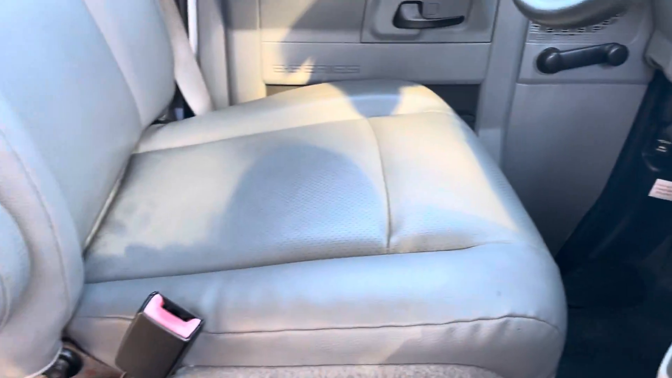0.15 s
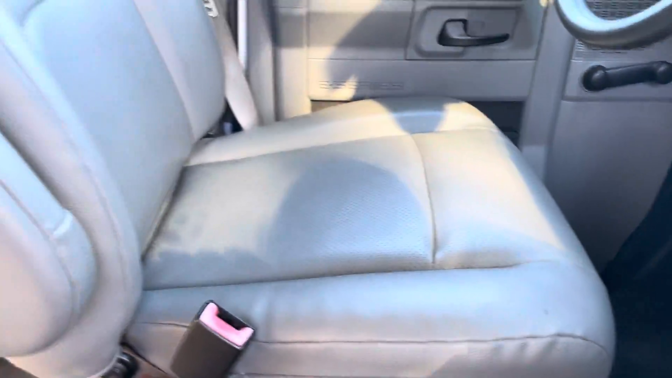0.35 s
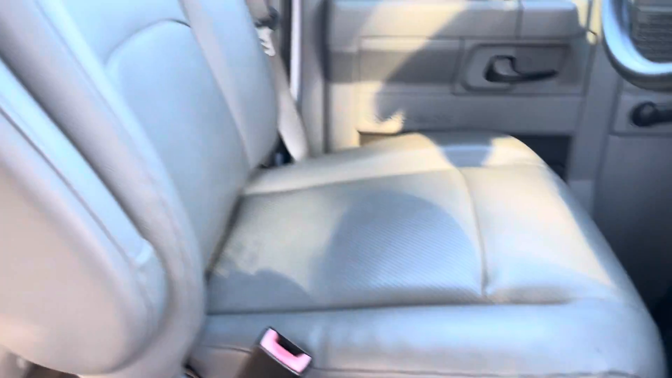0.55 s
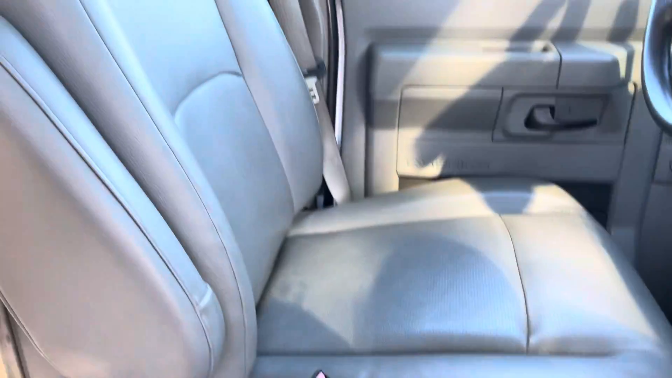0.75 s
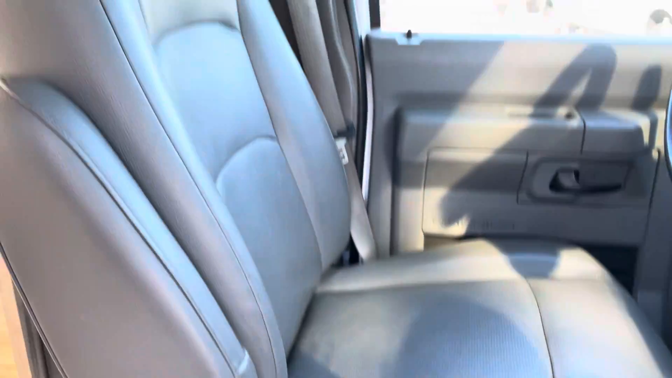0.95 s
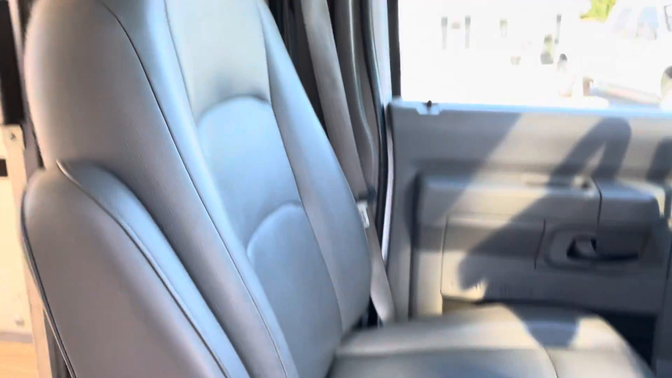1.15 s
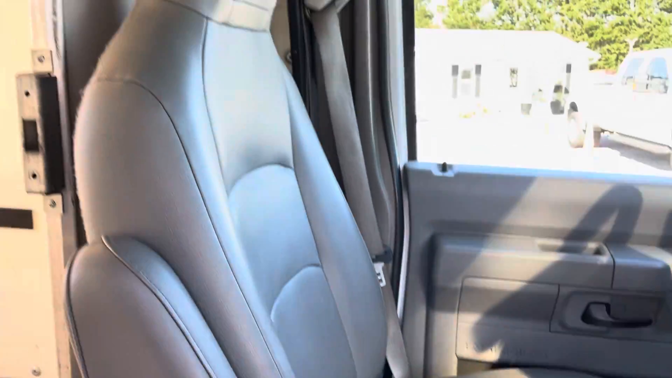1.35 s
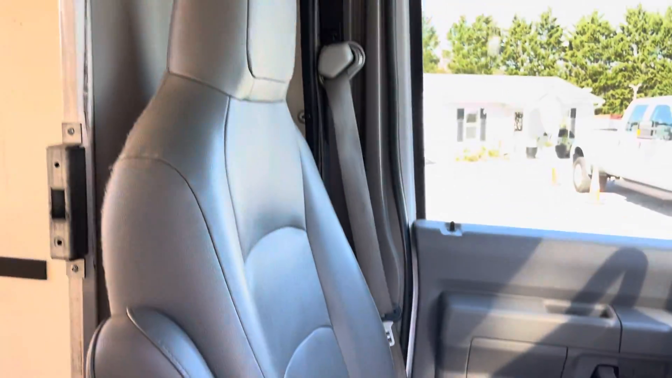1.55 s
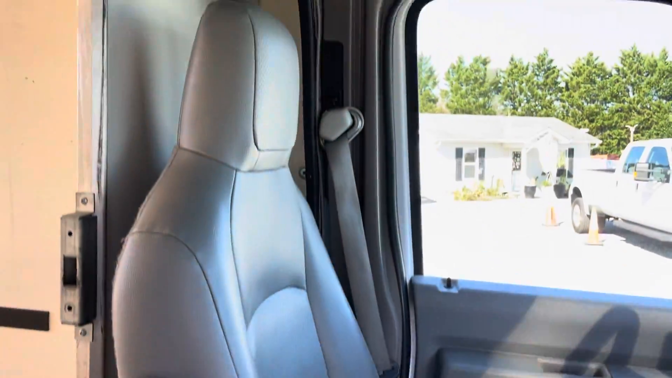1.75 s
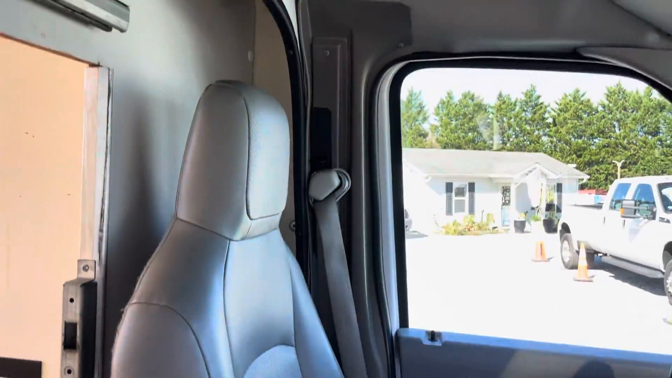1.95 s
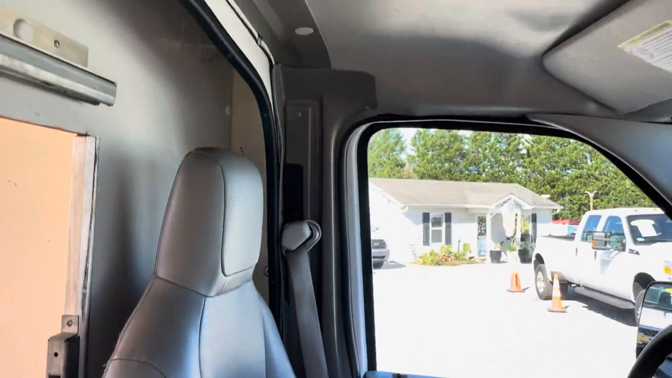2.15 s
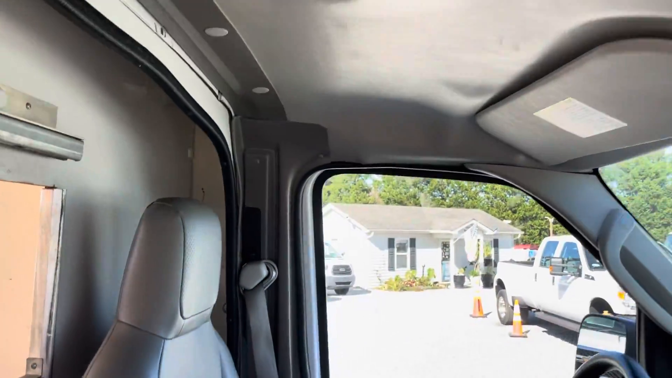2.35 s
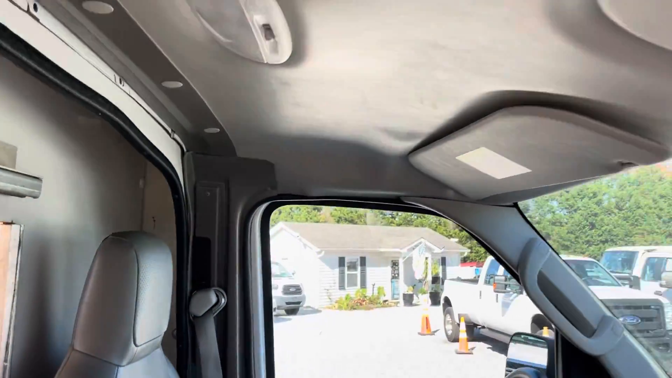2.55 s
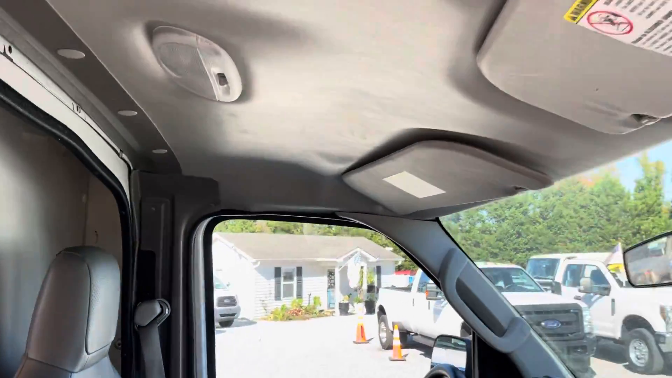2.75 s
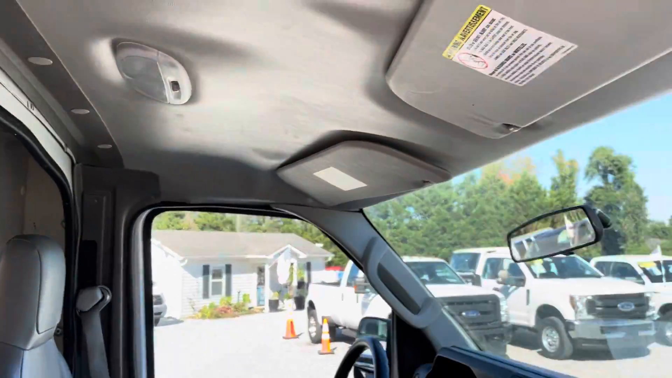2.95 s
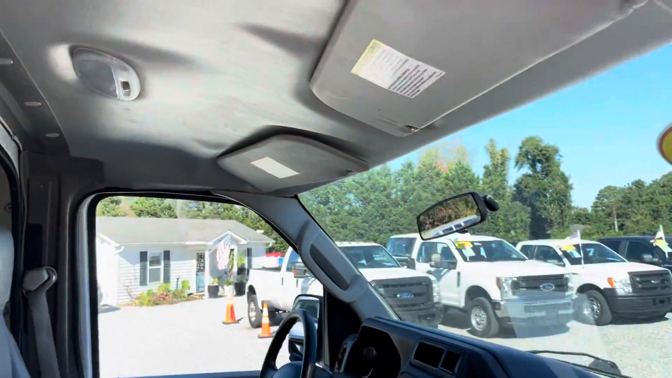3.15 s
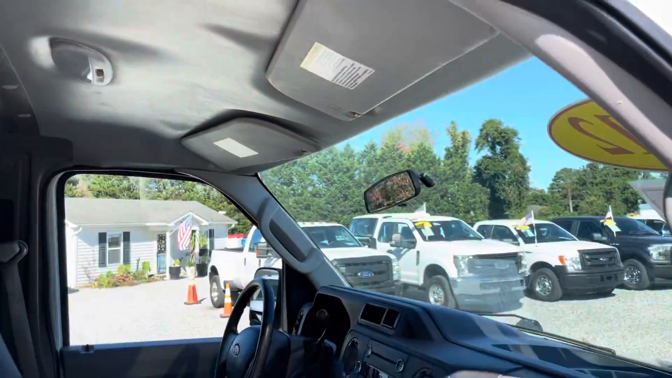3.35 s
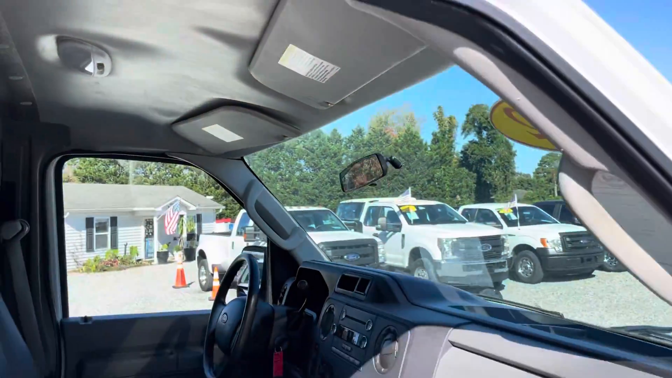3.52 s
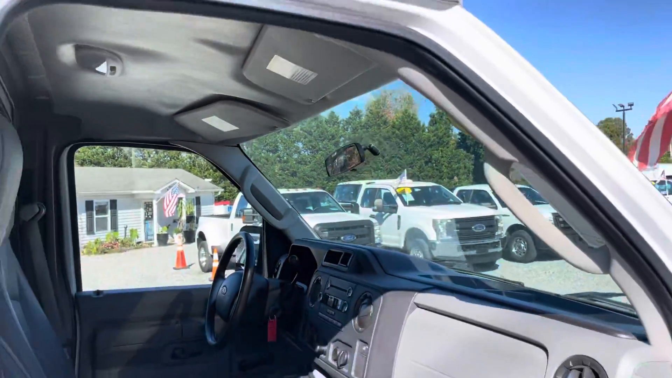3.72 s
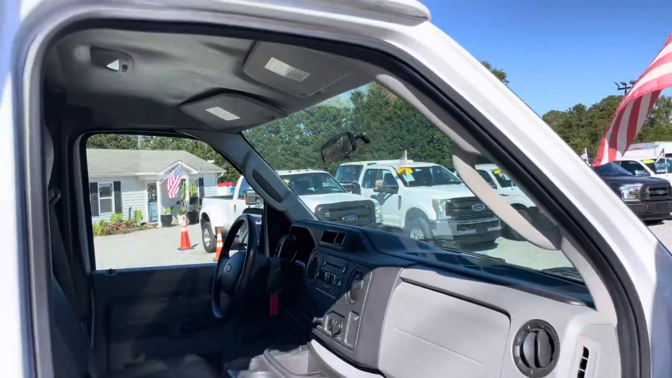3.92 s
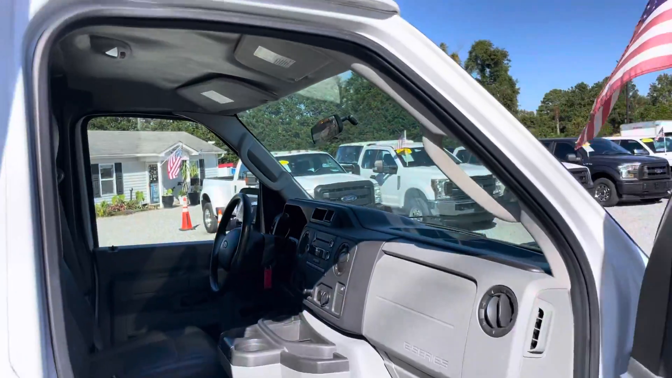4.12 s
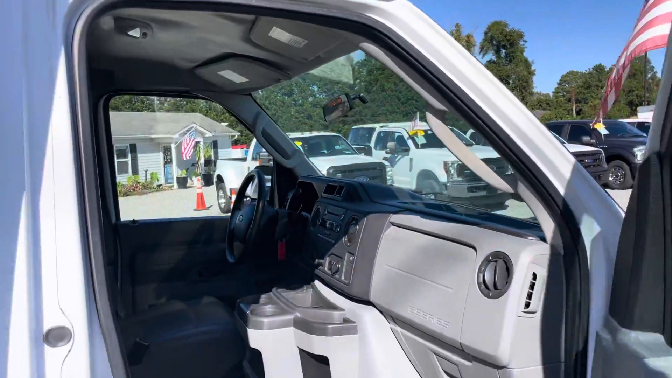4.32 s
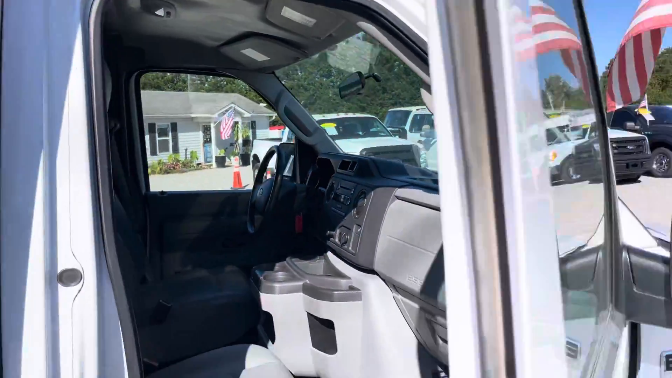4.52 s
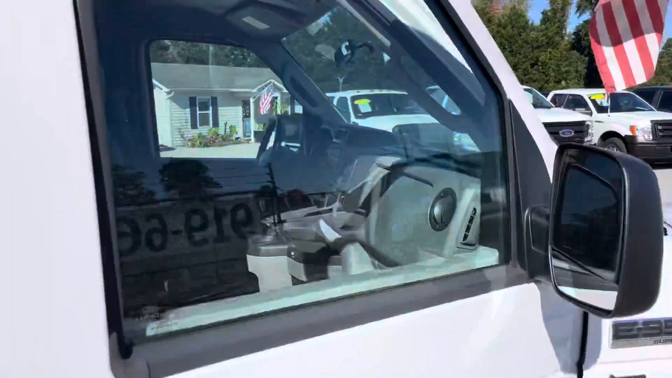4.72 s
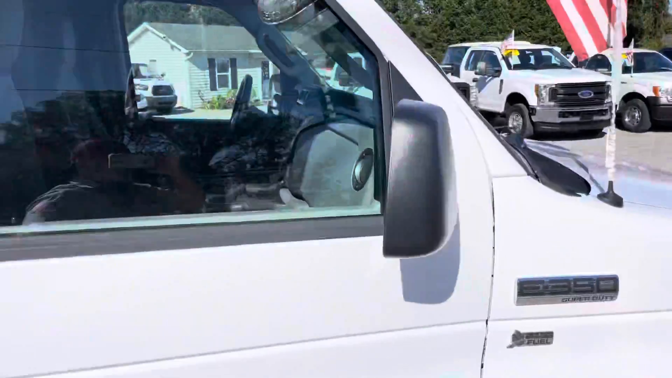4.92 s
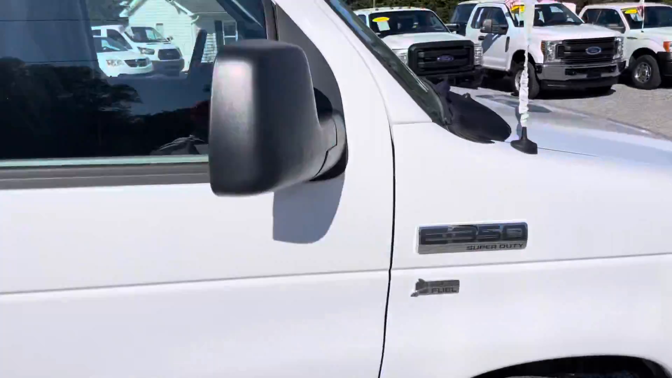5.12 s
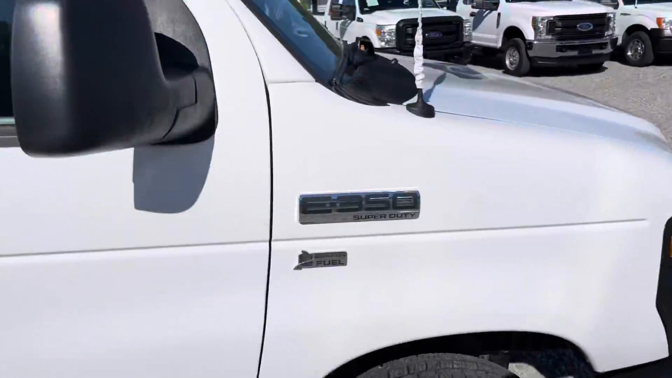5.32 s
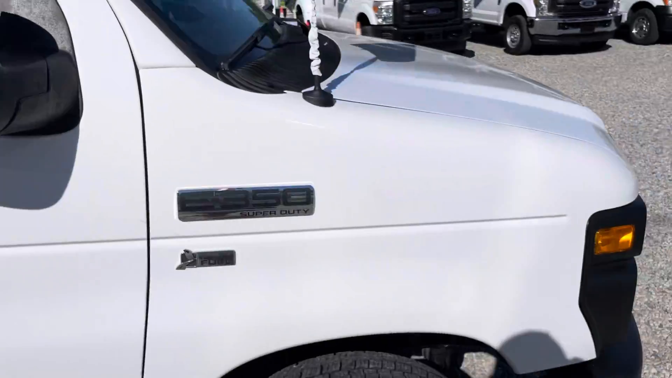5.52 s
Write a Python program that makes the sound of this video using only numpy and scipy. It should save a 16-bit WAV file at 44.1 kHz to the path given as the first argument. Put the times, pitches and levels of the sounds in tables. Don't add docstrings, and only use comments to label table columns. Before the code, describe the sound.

Low engine hum and airy outdoor noise, small squeaks and crunches of movement, then a hard metallic van door slam and hollow aftershake.

```python
import sys
import numpy as np
from scipy import signal
from scipy.fft import rfft, irfft
from scipy.io import wavfile

SR = 44100
rng = np.random.default_rng(int(sys.argv[2]) if len(sys.argv) > 2 else 0)


def wav_out(sig):
    wavfile.write(sys.argv[1], SR, np.round(np.clip(np.atleast_2d(sig).T, -1, 1) * 32767).astype(np.int16))


def boost(x):
    u = np.asarray(x, float) / 20
    return 10 ** u


N = 245637

# freq_hz [Hz], left_lead_rad [rad]; ports cancel near 8.5 kHz, agree above 12 kHz
PORT_PHASE = [(0, 0), (300, .5), (700, 1.3), (1600, 1.9), (2300, 1.1), (4900, 1.5), (6200, .3),
              (7300, -2.2), (8100, -2.7), (9500, -3.8), (11000, -4.8), (12300, -6.05), (20000, -6.05)]
# freq_hz [Hz], left_minus_right_db [dB]
NEAR_TILT = [(60, -0.5), (150, 0), (380, 1), (950, 2.5), (2380, -3.5), (5980, 2), (15000, 0)]
# freq_hz [Hz], left_minus_right_db [dB]
FAR_TILT = [(60, -1.0), (150, 0), (380, 0.5), (950, -1.0), (2380, 0), (5980, 6.5), (15000, -2.5)]
# time_s [s], outside_share [0-1]
OUTSIDE_SHARE = [(0, 0.22), (1.5, 0.09), (2.5, 0.51), (3.5, 0.97), (5, 0.83)]

# time_s [s], cycle_hz [Hz]
ENGINE_CYCLE_HZ = [(0, 5.65), (1.1, 5.63), (2, 5.6), (3, 5.575), (3.6, 5.61), (4.2, 5.635), (5.5, 5.62)]
ENGINE_ORDERS = [8, 9, 10, 11, 13, 14, 15, 16, 17, 19, 21, 23, 24, 25, 26, 27]
PHONE_STATIONS_S = [.7, 1.8, 3.0, 3.9, 4.6]
ORDER_LEVELS_DB = [(-31, -33, -37, -33.5, -34.5), (-39, -76, -50, -52, -55), (-43.5, -53, -50, -52, -52),
                   (-35.5, -35.5, -37.5, -40, -42), (-36.5, -38, -57, -35.5, -38),
                   (-42.5, -43, -36.5, -31.5, -35), (-52, -73, -61, -66, -59), (-50, -61, -41, -48, -46),
                   (-59, -49, -38, -36, -41), (-72, -46, -46, -49, -68), (-68, -54, -64, -62, -57),
                   (-46.5, -56, -61, -48, -43), (-51, -50, -49, -45.5, -42), (-76, -83, -55, -46, -59),
                   (-47, -52.5, -47.5, -40, -43), (-50, -50, -46, -39.5, -45.5)]
# time_s [s], left_minus_right_db [dB]
ENGINE_BALANCE = [(0, -1.5), (1.8, -1.5), (2.6, 0), (4.5, -0.5), (5.2, -1)]
HIGH_ORDER_HZ, HIGH_ORDER_DB, HIGH_ORDER_FAR_DB = 191.6, -37.5, -58
HIGH_ORDER_NEAREST_S, HIGH_ORDER_SPAN_S = 4.5, 0.31
FAN_HZ = 233
# time_s [s], level_db [dB rms]
FAN_LEVEL = [(0, -58), (2.4, -61), (2.62, -45.5), (3.0, -43.5), (3.2, -62), (3.6, -48), (4.1, -40.5),
             (4.3, -43.5), (4.45, -43.5), (4.9, -41), (5.5, -43.5)]

# time_s [s], level_db [dB]
LOT_LOUDNESS = [(0, -52), (.3, -47), (1.5, -49), (2.1, -47.5), (2.5, -49), (2.97, -44.5), (3.35, -41.5),
                (3.6, -41.5), (4.17, -37), (4.6, -34.5), (4.85, -33), (5.06, -27.5), (5.18, -39.5),
                (5.29, -27.5), (5.41, -36.5), (5.52, -33)]
# freq_hz [Hz], density_db [dB per Hz]
LOT_SUM_SPECTRUM = [(15, -37.5), (25, -25), (53, -8), (78, -7.5), (354, -27), (911, -30.5), (1890, -38.5),
                    (6560, -57), (7310, -59), (8360, -99), (9320, -65), (11000, -61), (13600, -55),
                    (14800, -61), (16000, -91)]
# freq_hz [Hz], density_db [dB per Hz]
LOT_DIFFERENCE_SPECTRUM = [(15, -40), (25, -19), (70, 4), (108, -16), (157, 0.5), (263, -13), (911, -11.5),
                           (2160, -25.5), (3160, -30), (3920, -34.5), (5570, -41.5), (9070, -36),
                           (11300, -43), (12900, -58), (16000, -72)]
LOT_DB, DIFFERENCE_DB = -47, -17
# centre_hz [Hz], loudness_share [0-1], outside_gain_db [dB]
LOT_MOTION = [
    (191, 0.93, -3),
    (830, 0.99, -0.5),
    (3700, 0.67, 1.5),
    (12000, 0.56, 1.5),
]
# start_s [s], length_s [s], rumble_db [dB], hiss_db [dB], air_db [dB]
PORT_SHADES = [
    (1.617, 0.52, 1.5, 3, -4),
    (2.31, 0.46, 4.5, 1.5, 0.5),
    (4.274, 0.19, -2.5, -5, -1.5),
    (5.053, 0.1, -0.5, 0, -4.5),
]
SHADE_EDGE_S = 0.16
# centre_hz [Hz], width_hz [Hz], cab_db [dB], outside_db [dB]
HOLLOW_BANDS = [(297.2, 31, -59, -55.5), (412.4, 59, -53, -69.5), (872, 97, -62, -49),
                (1044, 220, -58.5, -52), (1820, 330, -66.5, -52), (2560, 160, -94, -54),
                (2260, 620, -71, -65), (773, 35, -61.5, -60), (1000, 37, -71, -60), (1493, 61, -67, -54.5),
                (686, 50, -67, -61), (555, 30, -61, -75), (1155, 24, -72, -57)]
# centre_hz [Hz], width_hz [Hz], level_db [dB]
FLICKER_BANDS = [
    (7960, 310, -88.5),
    (9900, 950, -102),
    (15300, 800, -79),
]

# start_s [s], length_s [s], level_db [dB], pitch_hz [Hz]
CHIRPS = [
    (0.203, 0.012, -57, 6520),
    (0.229, 0.069, -64.5, 6630),
    (.314, 0.05, -72, 6300),
]
CHIRP_RISE_HZ_PER_S, CHIRP_ATTACK_S, CHIRP_T60_S = 900, 0.013, 0.058
WHINE_S, WHINE_HOLD_S, WHINE_DB, WHINE_T60_S = 0.3, 0.16, -65, 0.82
WHINE_TOP_HZ, WHINE_TOP_S, WHINE_ARCH_HZ_PER_S2 = 3190, 0.4, 2100
# start_s [s], length_s [s], from_hz [Hz], to_hz [Hz], level_db [dB]
VINYL_SQUEAKS = [
    (.35, .08, 2280, 2250, -68),
    (1.72, .1, 1960, 2150, -58),
    (1.85, .09, 2220, 2240, -64),
    (1.97, .03, 3200, 3260, -66),
    (2.25, .04, 1880, 1930, -64),
    (.245, .04, 3020, 3050, -64),
]
# start_s [s], peak_db [dB], centre_hz [Hz], t60_s [s], bright_db [dB]
SNAP_TICKS = [(0.455, -48, 4930, 0.037, -49), (0.596, -45, 4800, 0.044, -47),
              (2.715, -48, 5000, 0.024, -73), (2.814, -33, 5500, 0.03, -73), (3.163, -37, 2960, 0.042, -57),
              (3.365, -35, 2880, 0.018, -76), (3.404, -32, 1998, 0.03, -49), (3.64, -40, 3520, 0.045, -52),
              (4.016, -42, 5060, 0.037, -60), (4.809, -31, 4300, 0.051, -45.5),
              (4.91, -40, 4000, 0.029, -45), (4.966, -49, 6030, 0.035, -44),
              (5.126, -39.5, 4000, 0.026, -50), (4.935, -50, 6000, 0.017, -57),
              (5.265, -54, 5000, 0.016, -49), (5.39, -56, 4980, 0.05, -52), (5.482, -52, 6040, 0.06, -48)]
FIRST_STROKE = 4.5
# start_s [s], peak_db [dB], centre_hz [Hz], t60_s [s], low_share [-]
DULL_KNOCKS = [(2.94, -32, 1200, .03, .2), (3.365, -20, 1100, .03, .2), (3.3655, -19, 1650, .02, .1),
               (3.405, -19, 1150, .025, .1), (3.406, -18, 1800, .02, .1), (3.437, -26, 1600, .02, .1),
               (3.456, -24, 1550, .02, .1), (3.5012, -11, 1140, .035, .2), (3.504, -23, 800, .03, .3),
               (2.005, -29, 1250, .04, .3), (4.64, -20, 420, .02, .6)]
# start_s [s], length_s [s], dull_db [dB], bright_db [dB]
CLOTH_SCUFFS = [(1.684, 0.35, -52, -76), (2.02, 0.23, -54, -56.5), (2.385, 0.042, -64, -56),
                (2.817, 0.019, -50.5, -60), (2.897, .02, -52.5, -77), (3.38, .008, -62, -65),
                (3.413, 0.025, -43, -51), (3.476, 0.049, -60, -55), (4.02, 0.014, -46, -56),
                (4.16, 0.12, -60, -57), (4.32, 0.033, -55, -55), (4.612, 0.047, -56, -70),
                (5.23, 0.033, -48, -54), (5.308, 0.044, -39, -50)]
SCUFF_ATTACK_S, SCUFF_ATTACK_SHARE, SCUFF_T60_S = 0.0092, 0.23, 0.21
# start_s [s], length_s [s], level_db [dB]
SLEEVE_RUSTLES = [
    (0.598, .02, -59),
    (3.42, 0.097, -56),
    (4.036, .03, -66),
    (5.26, .02, -58),
    (5.298, 0.069, -48),
    (5.408, 0.011, -54),
]
# start_s [s], length_s [s], level_db [dB]
GRAVEL_STEPS = [(2.814, 0.14, -47.5), (3.357, 0.095, -46), (3.433, 0.24, -40.5), (4.206, 0.033, -36.5),
                (4.296, 0.12, -39.5), (4.625, 0.18, -42), (5.18, 0.032, -36), (5.247, 0.014, -34),
                (5.3, .05, -39), (5.385, 0.04, -40), (5.46, 0.11, -41)]
GRAVEL_ATTACK_S, GRAVEL_T60_S = 0.037, 0.37

# peak_s [s], level_db [dB], attack_s [s], hold_s [s], t60_s [s]
CRACK_BURSTS = [
    (4.998, -31, .004, .01, .03),
    (5.0105, -17, .003, .001, .025),
    (5.012, -22, .001, .011, .025),
    (5.04, -29, .012, .012, .05),
    (5.055, -48, .005, .02, .18),
]
# freq_hz [Hz], density_db [dB per Hz]
CRACK_SPECTRUM = [(180, -24), (300, -26), (700, 1.5), (2170, -19), (4000, -22.5), (7200, -27.5),
                  (9000, -29.5), (13100, -30.5), (16000, -33)]
# start_s [s], blow_db [dB], hardness_hz [Hz]
DOOR_CONTACTS = [(4.9993, -19, 1300), (5.0035, -22, 2300), (5.006, -21, 2200), (5.0098, -11, 5000),
                 (5.012, -11, 1400), (5.0148, -13, 800), (5.0205, -20, 1400), (5.040, -19, 1000),
                 (5.0445, -15, 1200), (5.049, -18, 1000), (5.053, -25, 900), (5.131, -22, 900),
                 (5.137, -22, 700)]
# freq_hz [Hz], level_db [dB], t60_s [s]
DOOR_MODES = [(397, 0, 0.046), (498, -20, 0.013), (660, 7, 0.028), (690, -8, 0.032), (850, 3, 0.059),
              (964, -1, 0.071), (1200, -5, 0.077), (1440, -1, 0.018), (1570, -19, 0.071), (1850, -5, 0.078),
              (2380, -26, 0.025), (2540, -28, 0.027), (3260, -15, 0.0069), (3200, -12, 0.014),
              (3940, -9, 0.013), (3940, 5, 0.019), (4480, -21, 0.012)]
# start_s [s],
# peak_db [dB], pitch_hz [Hz], t60_s [s]
PART_STRIKES = [(4.9993, -11, 1000, .012), (5.003, -18, 1500, .03), (5.0055, -20, 2050, .02),
                (5.0075, -21, 1750, .015), (5.0098, -12, 3400, .008), (5.0102, -11, 4000, .022),
                (5.0145, -20, 4200, .015), (5.0118, -17, 2350, .012), (5.0108, -3, 710, .019),
                (5.0122, -19, 1150, .015), (5.0153, 0, 560, .02), (5.0186, -13, 800, .025),
                (5.0255, -14, 230, .04), (5.0205, -14, 1400, .015), (5.0405, -19, 850, .03),
                (5.0385, -15, 400, .04), (5.0443, -14, 820, .022), (5.049, -10, 430, .04),
                (5.0465, -22, 1700, .02), (5.1, -26, 1150, .03), (5.126, -27, 1550, .03),
                (5.083, -21, 470, .05), (5.131, -21, 400, .08), (5.14, -22, 330, .06),
                (5.215, -19, 290, .1), (5.235, -21, 136, .3), (5.268, -16, 142, .25), (5.42, -13, 66, .35),
                (5.508, -17, 72, .2), (5.195, -26, 684, .05), (5.247, -21, 400, .04),
                (5.248, -30, 2100, .02), (5.257, -24, 611, .04), (5.262, -25, 1300, .025),
                (5.272, -27, 1800, .02), (5.3, -25, 900, .04), (5.312, -24, 640, .05),
                (5.328, -28, 1700, .02), (5.339, -20, 638, .03), (5.342, -27, 1400, .02),
                (5.386, -23, 616, .04), (5.474, -29, 930, .06), (5.49, -27, 730, .06),
                (5.545, -24, 730, .05)]
THUMP_S, THUMP_SOFT_HZ = 5.023, 125
# freq_hz [Hz], level_db [dB], t60_s [s]
BODY_MODES = [(47.3, -11, 0.19), (72.6, -12.5, 0.21), (98, -18.5, 0.15), (86, -21.5, 0.3),
              (129.7, -22, 0.46), (136.8, -19.5, 0.53), (161, -17, 0.27), (177, -18, 0.32),
              (201.4, -17, 0.22), (239, -36, 0.19), (287, -19.5, 0.067), (338, -41, 0.15),
              (378, -26.5, 0.11)]
# start_s [s], level_db [dB]
BODY_SHAKES = [(5.047, -15), (5.065, -14), (5.08, -6.5), (5.13, -16), (5.217, -12.5), (5.233, -16),
               (5.256, -22), (5.291, -15), (5.35, -12), (5.407, -12), (5.421, -16), (5.462, -16),
               (5.512, -10.5)]
# peak_s [s], deep_db [dB], upper_db [dB]
BODY_BOOMS = [
    (5.08, -24, -20),
    (5.214, -18, -22.5),
    (5.3, -26, -36),
    (5.425, -11, -35),
    (5.47, -20, -32),
    (5.52, -34, -33),
]
BOOM_ATTACK_S, BOOM_HOLD_S, DEEP_T60_S, UPPER_T60_S = 0.036, 0.017, 0.16, 0.99
# freq_hz [Hz], level_db [dB rms]
BOX_MODES = [
    (67, -31.5),
    (78, -29),
]
BOX_S, BOX_IN_STEP_S = 5.2, 5.222
BOX_ATTACK_S, BOX_HOLD_S, BOX_T60_S = 0.1, 0.33, 0.8


def rms_one(x):
    return x / np.sqrt(np.mean(x ** 2) + 1e-20)


def in_time(rows):
    s, *columns = np.transpose(rows)
    return [np.interp(np.arange(N) / SR, s, c) for c in columns]


def at_hz(points, hz):
    points_hz, points_db = np.transpose(points)
    return np.interp(np.log(hz), np.log(points_hz), points_db)


def drift(rate_hz):
    r = np.exp(-80 * np.pi * rate_hz / SR)
    noise = rng.standard_normal(N // 40 + 2002)
    slow = signal.lfilter([1], [1, -2 * r, r * r], noise)[2000:]
    return np.interp(np.arange(N) / 40, np.arange(len(slow)), rms_one(slow))


def band(x, low_hz, high_hz):
    return signal.sosfilt(signal.butter(2, [low_hz, high_hz], "band", fs=SR, output="sos"), x)


def coloured(points):
    hz = np.fft.rfftfreq(N, 1 / SR) + 1
    return rms_one(irfft(rfft(rng.standard_normal(N)) * boost(at_hz(points, hz)), N))


def ring(clicks, hz, t60_s):
    r, w = boost(-60 / (t60_s * SR)), 2 * np.pi * hz / SR
    return signal.lfilter([0, np.sin(w)], [1, -2 * r * np.cos(w), r * r], clicks + 1e-18)


def swell(s, hold_s, attack_s, t60_s):
    t = np.arange(N) / SR - s
    rise = np.clip(1 + t / attack_s, 0, 1) ** 2
    return rise * boost(-60 * np.clip((t - hold_s) / t60_s, 0, 3))


def ports(x):
    gap_rad = np.interp(np.fft.rfftfreq(N, 1 / SR), *np.transpose(PORT_PHASE))
    return irfft(rfft(x) * np.exp(0.5j * gap_rad * [[1], [-1]]), N)


def leaning(x, points):
    lean_db = at_hz(points, np.fft.rfftfreq(N, 1 / SR) + 1)
    return irfft(rfft(x) * boost(np.array([lean_db, -lean_db]) / 2), N)


def engine():
    t = np.arange(N) / SR
    turn = 2 * np.pi * np.cumsum(in_time(ENGINE_CYCLE_HZ)[0]) / SR
    out = np.zeros((2, N))
    for k, levels_db in zip(ENGINE_ORDERS, ORDER_LEVELS_DB):
        phase = k * turn + rng.uniform(0, 2 * np.pi) + 0.2 * drift(3)
        level_db = np.interp(t, PHONE_STATIONS_S, levels_db) + 2.0 * drift(4.0)
        spread_rad = 0.00046 * k ** 1.76 + 0.015
        out += np.sqrt(2) * boost(level_db) * np.sin(phase - spread_rad * np.array([[1], [-1]]))
    lean_db, = in_time(ENGINE_BALANCE)
    return out * boost(np.array([lean_db, -lean_db]) / 2)


def high_order():
    t = np.arange(N) / SR
    nearness = np.exp(-((t - HIGH_ORDER_NEAREST_S) / HIGH_ORDER_SPAN_S) ** 2)
    level_db = HIGH_ORDER_FAR_DB + (HIGH_ORDER_DB - HIGH_ORDER_FAR_DB) * nearness + 1.8 * drift(13.0)
    return np.sqrt(2) * boost(level_db) * np.sin(2 * np.pi * HIGH_ORDER_HZ * t)


def fan():
    level_db = in_time(FAN_LEVEL)[0] + 1.4 * drift(11)
    phase = 2 * np.pi * FAN_HZ * np.arange(N) / SR + 0.14 * drift(4.9)
    return np.sqrt(2) * boost(level_db) * np.sin(phase)


def lot_change():
    loud_db, = in_time(LOT_LOUDNESS)
    out_share, = in_time(OUTSIDE_SHARE)
    change_db = np.array([share * loud_db + outside_db * out_share for _, share, outside_db in LOT_MOTION])
    for s, length_s, rumble_db, hiss_db, air_db in PORT_SHADES:
        end_s = s + length_s
        cover, = in_time([(s - SHADE_EDGE_S, 0), (s, 1), (end_s, 1), (end_s + SHADE_EDGE_S, 0)])
        change_db += np.outer([rumble_db, 0, hiss_db, air_db], cover)
    return change_db - change_db.mean(axis=1, keepdims=True)


def lot():
    change_db = lot_change()
    hz = np.fft.rfftfreq(N, 1 / SR) + 1
    colour_db = [at_hz(LOT_SUM_SPECTRUM, hz), at_hz(LOT_DIFFERENCE_SPECTRUM, hz) + DIFFERENCE_DB]
    shaped = rfft(rng.standard_normal((2, N))) * boost(colour_db)
    roar = irfft(shaped[0] * (hz > 350) * (hz < 1800), N)
    shaped /= np.sqrt(np.mean(roar ** 2))
    octave = np.log2(hz / 30)
    band_octave = np.log2(np.array(LOT_MOTION)[:, 0] / 30)
    together = drift(3)
    out = np.zeros((2, N))
    for k in np.arange(0, 9.6, 0.5):
        window = np.clip(1 - 2 * abs(octave - k), 0, 1)
        place = np.interp(k, band_octave, range(4))
        weights = np.clip(1 - abs(place - np.arange(4)), 0, 1)
        gain_db = weights @ change_db + 0.7 * together + 1.2 * drift(15)
        out += irfft(shaped * window, N) * boost(gain_db)
    mid, side = boost(LOT_DB) * out
    return np.array([mid + side, mid - side])


def hollows():
    out_share, = in_time(OUTSIDE_SHARE)
    out = np.zeros((2, N))
    for hz, width_hz, cab_db, free_db in HOLLOW_BANDS:
        source = ports(rng.standard_normal(N)) + 0.65 * rng.standard_normal((2, N))
        noise = rms_one(band(source, hz - width_hz / 2, hz + width_hz / 2))
        out += noise * boost(cab_db + out_share * (free_db - cab_db) + 2.2 * drift(6))
    return out


def flickers():
    out = np.zeros(N)
    for hz, width_hz, level_db in FLICKER_BANDS:
        noise = rms_one(band(rng.standard_normal(N), hz - width_hz / 2, hz + width_hz / 2))
        out += boost(level_db + 4.5 * drift(12)) * noise
    return out


def chirp_and_squeak():
    t = np.arange(N) / SR
    wobble_hz, flutter = 120 * drift(130), boost(2.1 * drift(40))
    chirp = np.zeros(N)
    for s, length_s, level_db, start_hz in CHIRPS:
        hz = start_hz + CHIRP_RISE_HZ_PER_S * np.clip(t - s, 0, length_s) + wobble_hz
        gain = boost(level_db) * swell(s, length_s, CHIRP_ATTACK_S, CHIRP_T60_S)
        chirp += gain * np.sin(2 * np.pi * np.cumsum(hz) / SR)
    hz = WHINE_TOP_HZ - np.minimum(WHINE_ARCH_HZ_PER_S2 * (t - WHINE_TOP_S) ** 2, 300)
    gain = boost(WHINE_DB - 5 + 4.5 * drift(15)) * swell(WHINE_S, WHINE_HOLD_S, 0.04, WHINE_T60_S)
    whine = gain * np.sin(2 * np.pi * np.cumsum(hz) / SR)
    return flutter * chirp * boost([[-1.5], [1.5]]) + whine


def squeaks():
    t, wobble_hz = np.arange(N) / SR, 35 * drift(68)
    out = np.zeros(N)
    for s, length_s, from_hz, to_hz, level_db in VINYL_SQUEAKS:
        hz = np.interp(t, [s, s + length_s], [from_hz, to_hz]) + wobble_hz
        gain = boost(level_db + 6.7 * drift(20)) * swell(s, length_s, 0.03, 0.15)
        out += gain * np.sin(2 * np.pi * np.cumsum(hz) / SR)
    return out


def burst(s, t60_s):
    t = np.arange(N) / SR - s
    decay = boost(-60 * np.clip(t, 0, 1) / t60_s)
    return rng.standard_normal(N) * (t > 0) * decay * np.clip(t / 0.00054, 0, 1)


def ticks():
    out = np.zeros(N)
    for s, peak_db, hz, t60_s, bright_db in SNAP_TICKS:
        noise = burst(s, t60_s)
        noise[round(s * SR) + 1] += FIRST_STROKE
        out += boost(peak_db + 1) * band(noise, hz / 1.7, hz * 1.6)
        out += boost(bright_db + 6) * band(noise, 7000, 15800)
    return out


def scuffs():
    grain_db = 2.2 * np.minimum(rng.exponential(1, N), 5) + 1.0 * drift(28)
    grains = rng.standard_normal((2, N)) * boost(grain_db)
    dull = rms_one(band(grains[0], 2200, 8000))
    bright = rms_one(band(grains[1], 9500, 15600))
    sleeve = rms_one(band(grains[0], 6300, 10800))
    out = np.zeros(N)
    for s, length_s, dull_db, bright_db in CLOTH_SCUFFS:
        gain = swell(s, length_s, SCUFF_ATTACK_S + SCUFF_ATTACK_SHARE * length_s, SCUFF_T60_S)
        out += gain * (boost(dull_db - 6.0) * dull + boost(bright_db - 7.0) * bright)
    for s, length_s, level_db in SLEEVE_RUSTLES:
        out += boost(level_db) * swell(s, length_s, 0.015, 0.21) * sleeve
    return out


def knocks():
    out = np.zeros(N)
    for s, peak_db, hz, t60_s, low_share in DULL_KNOCKS:
        click = np.zeros(N)
        click[round(s * SR)] = boost(peak_db - 5.0)
        click = signal.lfilter([0.07], [1, -1.5, 0.5625], click)
        for ratio, share in ((0.55, low_share), (0.73, -0.28), (1, 0.84), (1.33, -0.45)):
            out += share * ring(click, hz * ratio, t60_s)
    return out


def gravel():
    height = boost(1.0 * np.minimum(rng.exponential(1, N), 4)) * rng.choice([-1, 1], N)
    stones = (rng.random(N) < 900 / SR) * height
    size = rng.integers(0, 10, N)
    pitches_hz = np.geomspace(500, 2800, 10)
    clicks = rms_one(sum(ring(stones * (size == k), hz, 4.1 / hz) for k, hz in enumerate(pitches_hz)))
    gain = np.zeros(N)
    for s, length_s, level_db in GRAVEL_STEPS:
        gain += boost(level_db - 5.5) * swell(s, length_s, GRAVEL_ATTACK_S, GRAVEL_T60_S)
    return gain * clicks


def crack():
    return sum(boost(level_db) * swell(s, hold_s, attack_s, t60_s)
               for s, level_db, attack_s, hold_s, t60_s in CRACK_BURSTS)


def door():
    out = crack() * coloured(CRACK_SPECTRUM)
    shape = (len(DOOR_CONTACTS), len(DOOR_MODES))
    strengths = boost(rng.normal(0, 3, shape)) * rng.choice([-1, 1], shape)
    t = np.arange(round(0.12 * SR)) / SR
    for (s, blow_db, hard_hz), row in zip(DOOR_CONTACTS, strengths):
        rise = 1 - np.exp(-t * hard_hz)
        for (hz, level_db, t60_s), chance in zip(DOOR_MODES, row):
            softness = 1 + (hz / hard_hz) ** 4
            gain = chance * boost(blow_db + level_db - 8.5) / softness
            out[round(s * SR):][:len(t)] += gain * rise * boost(-60 * t / t60_s) * np.sin(2 * np.pi * hz * t)
    return out


def strikes():
    out, t = np.zeros(N + SR), np.arange(round(0.25 * SR)) / SR
    for s, peak_db, hz, t60_s in PART_STRIKES:
        envelope = boost(peak_db - 60 * t / t60_s) * (1 - np.exp(-3 * hz * t))
        out[round(s * SR):][:len(t)] += envelope * np.sin(2 * np.pi * hz * t)
    return out[:N]


def body():
    low = np.zeros(N)
    chance = rng.normal(0, 1, (len(BODY_SHAKES), len(BODY_MODES)))
    shakes_s, shakes_db = np.transpose(BODY_SHAKES)
    for k, (hz, level_db, t60_s) in enumerate(BODY_MODES):
        push = np.zeros(N)
        push[round(THUMP_S * SR)] = 1.5 / (1 + (hz / THUMP_SOFT_HZ) ** 2)
        push[[round(s * SR) for s in shakes_s]] = boost(shakes_db + 3 * chance[:, k])
        low += boost(level_db) * ring(push, hz, t60_s)
    low = signal.lfilter([0.15], [1, -0.85], low)
    low = signal.lfilter([0.06], [1, -0.94], low)
    deep, upper = np.zeros(N), np.zeros(N)
    for s, deep_db, upper_db in BODY_BOOMS:
        deep += boost(deep_db) * swell(s, BOOM_HOLD_S, BOOM_ATTACK_S, DEEP_T60_S)
        upper += boost(upper_db) * swell(s, BOOM_HOLD_S, BOOM_ATTACK_S, UPPER_T60_S)
    low += boost(-10.0) * deep * rms_one(band(rng.standard_normal(N), 33, 103))
    return low + boost(-7.5) * upper * rms_one(band(rng.standard_normal(N), 93, 316))


def box():
    t = np.arange(N) / SR - BOX_IN_STEP_S
    hum = sum(np.sqrt(2) * boost(level_db) * np.sin(2 * np.pi * hz * t) for hz, level_db in BOX_MODES)
    return swell(BOX_S, BOX_HOLD_S, BOX_ATTACK_S, BOX_T60_S) * hum


def slam():
    noise = np.array([coloured(CRACK_SPECTRUM), coloured(CRACK_SPECTRUM)])
    split = band(noise, 130, 7200) + boost(-4) * band(noise, 12000, 16000)
    scattered = boost(-5) * crack() * split
    return leaning(ports(door() + strikes()) + scattered, NEAR_TILT) + body() + box()


def scene():
    machinery = engine() + high_order() + fan()
    surroundings = leaning(lot() + hollows(), FAR_TILT) + flickers() + chirp_and_squeak()
    listener = squeaks() + ports(ticks() + scuffs() + knocks() + gravel())
    return machinery + surroundings + listener + slam()


def roll_off(x):
    return signal.sosfilt(signal.butter(12, 16490, fs=SR, output="sos"), x)


def record(dry):
    mix = signal.sosfiltfilt(signal.butter(3, 33, "high", fs=SR, output="sos"), dry)
    mix = 1.5 * np.tanh(mix / 1.5)
    mix = signal.sosfilt(signal.cheby2(10, 50, 16300, fs=SR, output="sos"), mix)
    return roll_off(mix)


dry = scene()
out = record(dry)
wav_out(out)
```